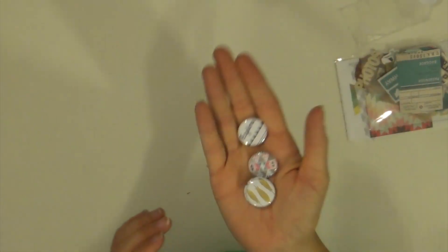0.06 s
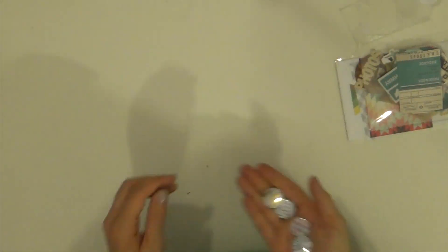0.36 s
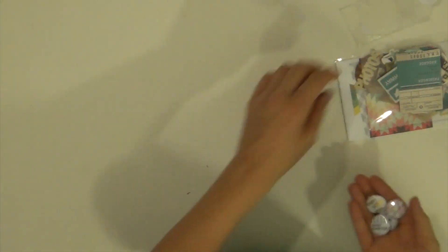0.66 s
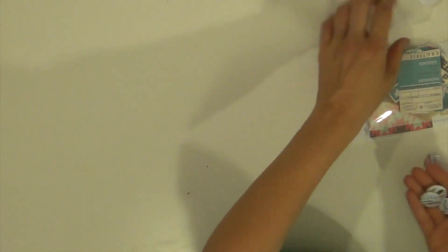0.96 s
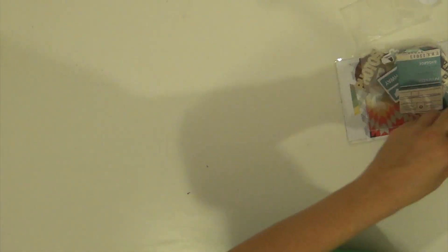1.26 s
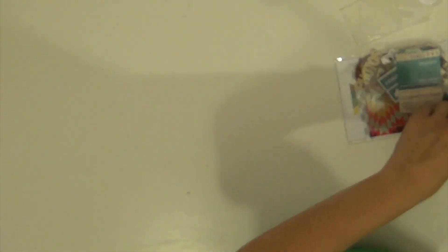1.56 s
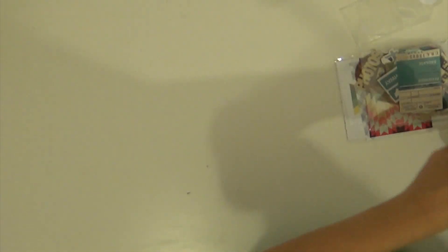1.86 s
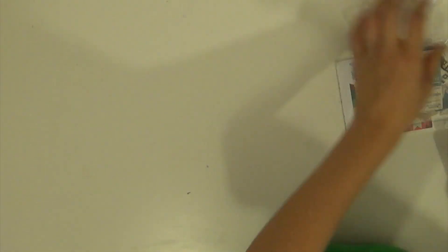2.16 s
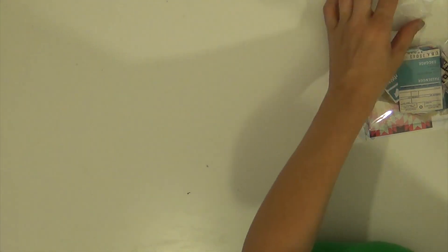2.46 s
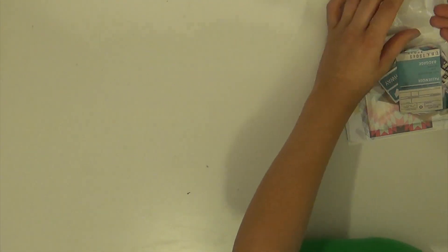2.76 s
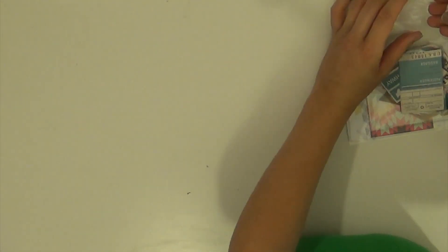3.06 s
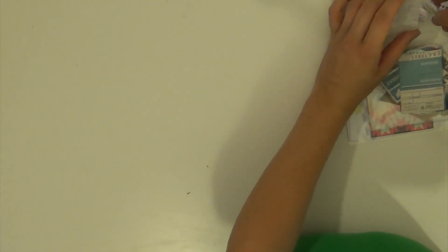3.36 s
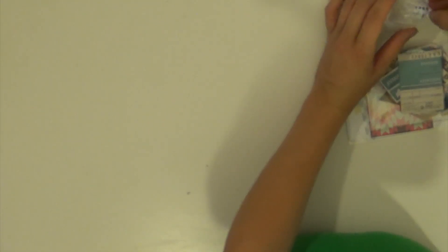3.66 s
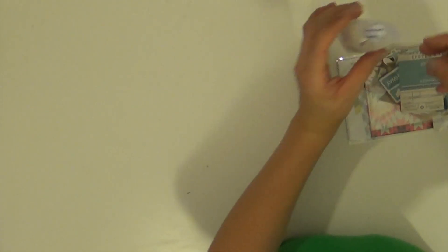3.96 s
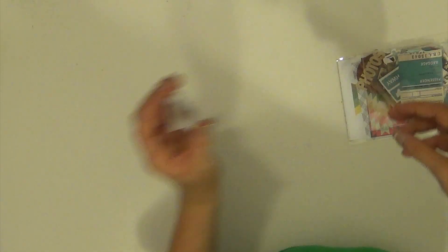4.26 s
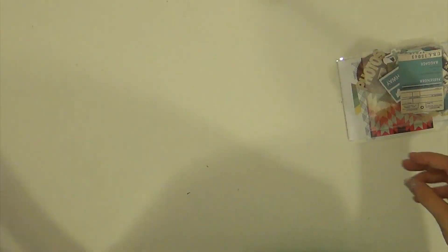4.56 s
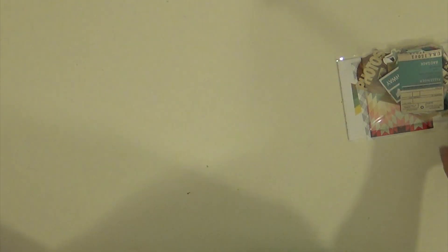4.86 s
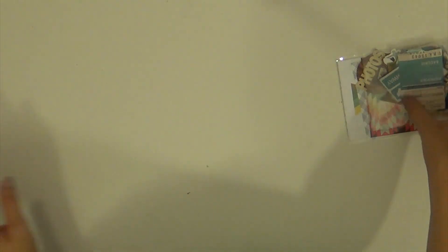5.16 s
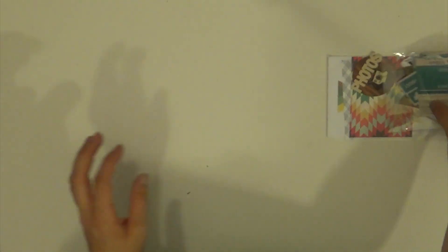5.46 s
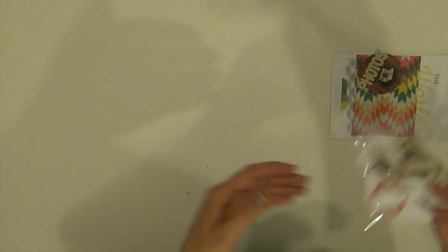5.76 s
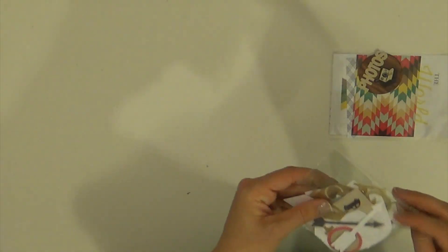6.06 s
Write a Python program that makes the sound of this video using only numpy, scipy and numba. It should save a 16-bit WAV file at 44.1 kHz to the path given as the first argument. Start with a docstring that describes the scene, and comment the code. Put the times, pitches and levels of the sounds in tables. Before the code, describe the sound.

Small metal buttons clink brightly together in a palm. One drops onto a table, bounces several times and briefly rolls to rest. A loud cluster of clinks follows, then a hand bumps the table softly and plastic sleeves crackle. The buttons clink, scrape and tumble as they are gathered up, leaving only light plastic rustling. An overhead microphone picks this up in a small room with a faint electrical hum.

```python
"""A table in a small room with mains hum. Small domed metal buttons clink in a palm, bounce and
roll on the table, then scrape and tumble over each other as they are gathered up; each contact
rings their shell modes. Plastic sleeves slide with tiny slips and crackle as creases give way.
A hand bumps the table. The limiter of a camera overhead flattens the loudest clinks."""
import sys
import numpy as np
from scipy import signal
from scipy.fft import rfft, irfft
from scipy.io import wavfile
from scipy.ndimage import uniform_filter1d, minimum_filter1d
from numba import njit

SR = 44100
rng = np.random.default_rng(int(sys.argv[2]) if len(sys.argv) > 2 else 0)


def digitize_waveform(pressure):
    """Quantize a signal to 16-bit integers and store it at the path in sys.argv[1].

    Rows of a 2-D input are taken as channels; values are limited to [-1, 1].
    """
    field = np.atleast_2d(pressure).T
    bounded = np.clip(field, -1, 1)
    quanta = np.round(bounded * 32767).astype(np.int16)
    wavfile.write(sys.argv[1], SR, quanta)


N = 269142
TIME_S = np.arange(N) / SR
AGE_S = np.arange(SR // 3) / SR  # time since a blow

# mains hum and thin electronic whine: f/Hz, level/dB
HUM_TONES = [(56, -58), (86, -59.5), (120, -54.5), (15735, -68)]
# button on button: t/s, level/dB, ring f/Hz, relative second mode/dB, relative top modes/dB
BUTTON_HITS = [(0.1948, -17, 4550, -19, -8), (0.273, -27, 4770, -20, -7), (0.3127, -13, 4670, -17.5, -6.5),
               (0.3187, -12, 4740, -34, -28), (0.3636, -7, 4640, -8, 4), (0.656, -14, 4670, -39, -8),
               (0.709, -7, 4610, -6, -17), (0.7667, -2.5, 4656, -47, -14), (2.0486, -10.5, 4620, -1, 0),
               (2.0681, 1, 4600, -15, -4), (2.0792, -6.5, 4578, -31, -34), (2.117, -14, 4608, -17, -21),
               (3.317, -14.5, 4597, -14, -4), (3.4041, -16, 4705, -39, -36), (3.4549, -5, 4710, -13, -12),
               (3.479, -14, 4720, -41, -37), (3.5267, -15, 4500, -26, -30), (3.5494, -13.5, 4720, -40, -32),
               (3.585, -4, 4730, -16, -35), (3.6225, -14, 4690, -15.5, -11),
               (3.6952, -14.5, 4730, -42, -30), (3.7917, -13, 4757, -15, -0.5), (3.824, -28, 4700, -13, -6),
               (4.083, -18.5, 4780, -18, 8.5), (4.126, -8, 4690, -14, 0), (4.1402, -10, 4600, -8.5, 5)]
# top shell modes: f/Hz, level/dB
SHELL_TOP_MODES = [(11700, -11.5), (12500, -9.5)]
# button on table: t/s, blow/dB, shell ring/dB, rim crack/dB
BOUNCES = [(0.9211, -17, -3, -8.5), (0.9258, -31, -5.5, -31), (0.943, -21, -10.5, -41),
           (1.0749, -18, -2, -15), (1.0951, -23, -3, -13.5), (1.174, -24, -3.5, -14.5),
           (1.1942, -27.5, -5.5, -12.5), (1.2176, -27.5, -11, -21), (1.2488, -24.5, -7.5, -12),
           (1.2593, -33, -18, -22), (1.3799, -36.5, -30.5, -45), (1.4278, -38.5, -33, -47),
           (1.456, -28, -29.5, -32)]
# hand over plastic: t/s, length/s, slide level/dB, crackle level/dB, crackle brightness/dB
HAND_STROKES = [(1.662, 0.1, -68, -57.5, -3), (2.421, 0.35, -53, -47.5, -2.5), (2.875, 0.15, -51, -41, 0.5),
                (3.428, 0.27, -41.5, -33, -0.5), (4.285, 0.26, -60, -48.5, -2),
                (4.859, 0.07256, -38.5, -34.5, 0), (5.279, 0.65, -50, -50.5, -4),
                (5.934, 0.15, -43, -45.5, 8.5)]
# wire pins on button backs: t/s, level/dB
PIN_TAPS = [(2.048, -11), (3.321, -11)]
# hand on table: t/s, level/dB
HAND_BUMPS = [(2.383, -34.5), (2.467, -31), (5.223, -28)]
# low table modes: f/Hz, level/dB, t60/s
TABLE_MODES = [(251.6, 12, 0.056), (597, 4.5, 0.077)]
# loudest creases: t/s, level/dB, brightness/dB, knock f/Hz
CREASE_SNAPS = [(2.553, -38.5, -0.5, 3760), (2.8709, -35.5, -4.5, 3400), (2.9687, -37, -0.5, 3800),
                (3.2398, -37, 1, 3220), (3.2794, -34, -0.5, 2640), (3.4417, -31, -2, 3950),
                (3.4988, -28, 0, 2290), (3.9498, -27, 6.5, 3500), (4.1847, -23, 5, 4074),
                (4.35, -32.5, 1.5, 1920), (4.5919, -33.5, -0.5, 1830), (4.8557, -31, 2.5, 2980),
                (4.9082, -32.5, -4, 2977), (5.3072, -28, 2.5, 2160), (5.3418, -33.5, 9, 1945),
                (5.484, -36, 5, 3040), (5.588, -38.5, 0.5, 1944), (5.6419, -35, 3, 2660),
                (5.665, -32.5, 3, 1630), (5.9845, -37, -3.5, 1990), (6.016, -31.5, 6.5, 2870)]
# rim on rim: t/s, length/s, level/dB, start f/Hz, end f/Hz
RIM_SCRAPES = [(3.357, 0.015, -32.5, 1870, 2660), (3.408, 0.036, -42.5, 2060, 1080),
               (3.654, 0.014, -35.5, 2270, 2150), (3.72, 0.015, -40, 2140, 2750)]
# envelope of the tumbling pile: t/s, level/dB
TUMBLE_ENVELOPE = [(4.085, -42.5), (4.12, -30.5), (4.14, -27), (4.185, -33.5), (4.24, -90)]
# stiff sleeve modes: f/Hz, level/dB
PACKET_MODES = [(2140, -55), (2970, -56), (4180, -58)]
# room decay: f/Hz, t60/s
ROOM_DECAY = [(250, 0.39), (4700, 0.36), (13000, 0.24)]
# spectra: f/Hz, level/dB
ROOM_AIR = [(25, -38), (118, -6.5), (208, -11.5), (349, -9), (952, -23), (3230, -25), (15200, -34)]
SHELL_CONTACT = [(1000, -36.5), (3500, -8.5), (4700, 6.5), (5400, -7.5), (6800, -21), (12400, -9.5),
                 (15500, -33)]
TABLE_HARD_BLOW = [(60, -40), (250, -14.5), (680, -6), (1680, -3.5), (4000, -6), (5600, -42)]
TABLE_SOFT_BLOW = [(140, -21.5), (235, -2), (650, -4), (5000, -29.5)]
RIM_CRACK = [(400, -34), (2500, -17), (4000, 6), (5600, 4.5), (8400, 6.5), (11500, 6), (13000, -25)]
FILM_SLIDE = [(240, -36), (400, -2.5), (2000, 0.5), (6950, -4), (9760, 0.5), (16000, -17)]
CREASE_BODY = [(400, -9), (1300, 1), (3200, 10), (5000, -11)]
CREASE_MID = [(1500, -15), (3400, -1.5), (6000, 3), (10000, -17)]
CREASE_TREBLE = [(4000, -8), (7500, 12.5), (10700, 20), (13000, 6.5), (16000, -14)]
# side response of the microphone pair: f/Hz, gain/dB
SIDE_RESPONSE = [(60, -21), (250, -7.5), (1000, 2.5), (4700, -3), (9000, -12.5)]

SECOND_MODE_HZ, BOUNCE_RING_HZ, BOUNCE_TOP_HZ = 8980, 4605, 11705


def amp(db):
    """Decibels to gain."""
    return 10 ** (np.asarray(db) / 20)


def colour(x, spectrum):
    """Minimum-phase filter; attacks stay sharp."""
    hz, db = np.transpose(spectrum)
    grid_hz = np.maximum(np.fft.rfftfreq(4096, 1 / SR), 1)
    cepstrum = irfft(np.log(amp(np.interp(np.log(grid_hz), np.log(hz), db))))
    cepstrum[1:len(cepstrum) // 2] *= 2
    cepstrum[len(cepstrum) // 2 + 1:] = 0
    return signal.fftconvolve(x, irfft(np.exp(rfft(cepstrum))))[:len(x)]


def noise(spectrum):
    """Coloured noise, rms 1."""
    x = colour(rng.standard_normal(N), spectrum)
    return x / x.std()


def damping(t60_s, free_s=0):
    """Exponential decay after free_s."""
    return np.exp(-np.log(1000) * np.maximum(AGE_S - free_s, 0) / t60_s)


def fade(t60_s, rise_s=0.00022):
    """Build-up during contact, then decay."""
    return (1 - np.exp(-(AGE_S / rise_s) ** 2)) * damping(t60_s)


def ring(hz, t60_s):
    """One decaying mode."""
    return np.sin(2 * np.pi * hz * AGE_S) * fade(t60_s)


def resonance(hz, t60_s):
    """Decaying mode, unit energy."""
    x = ring(hz, t60_s)
    return x / np.sqrt(np.sum(x ** 2))


def burst(spectrum, t60_s, rise_s=0.00036):
    """Dense cluster of fast modes; energy of 10 ms at rms 1."""
    x = colour(rng.standard_normal(len(AGE_S)) * fade(t60_s, rise_s), spectrum)
    return x / np.sqrt(np.sum(x ** 2) / (0.01 * SR))


def walk(rate_hz):
    """Smooth random wander, spread near 1."""
    step = int(SR / rate_hz)
    return uniform_filter1d(np.repeat(rng.standard_normal(N // step + 1), step), step)[:N]


def slips(per_s, spread_db):
    """Random tiny impacts of uneven size, rms 1."""
    sizes = amp(spread_db * np.minimum(rng.exponential(size=N), np.pi))
    x = (rng.random(N) < per_s / SR) * sizes * rng.choice([-1, 1], N)
    return x / x.std()


def grains(spectrum, per_s, spread_db):
    """Slips heard through a body, rms 1."""
    x = colour(slips(per_s, spread_db), spectrum)
    return x / x.std()


def swell(start_s, length_s, attack_s, release_s):
    """Linear attack; exponential release after length_s."""
    t = TIME_S - start_s
    return np.clip(t / attack_s, 0, 1) * np.exp(-np.maximum(t - length_s, 0) / release_s)


def until_next(hits):
    """One gate per hit: the next contact stops the ring."""
    gaps_s = np.diff(np.array(hits)[:, 0], append=np.inf)
    return [1 / (1 + np.exp(np.minimum((AGE_S - gap_s) * 1000, 20))) for gap_s in gaps_s]


def add(out, t, sound):
    """Mix a sound in at t seconds."""
    start = max(int(t * SR), 0)
    out[start:start + len(sound)] += sound[:N - start]


def hum_and_air(air_db=-53, side_db=-9, waver=0.32):
    """Wavering hum and room air; returns mid, side."""
    hum = np.zeros(N)
    for hz, db in HUM_TONES:
        level = amp(db) * np.sqrt(2) * (1 + waver * walk(rate_hz=11))
        hum += level * np.sin(2 * np.pi * hz * TIME_S + waver * walk(rate_hz=13))
    return hum + amp(air_db) * noise(ROOM_AIR), amp(air_db + side_db) * noise(ROOM_AIR)


def chatter(gap_s=0.0055, count=3):
    """One contact and its quick, duller rebounds."""
    clicks = np.zeros(len(AGE_S))
    rebounds_s = np.cumsum(gap_s * rng.uniform(0.76, 1.2, count))
    clicks[(rebounds_s * SR).astype(int)] = amp(2 * rng.standard_normal(count))
    clicks = uniform_filter1d(clicks, size=4)
    clicks[0] += 1
    return clicks


def rim_mode(hz, t60_s, split=0.011):
    """Upper mode of a crimped shell: a close pair, plus a broad flash at contact."""
    partner = ring(hz * (1 - split * rng.uniform(0.19, 3.2)), t60_s / 2)
    return ring(hz, t60_s) + 0.5 * partner + ring(hz, t60_s / 10)


def clinks(beat_hz=110, back_hz=4100, upper_t60_s=0.039):
    """Two near-equal shells chatter and beat over a lower back-plate note; skin soon damps them."""
    out = np.zeros(N)
    skin = damping(t60_s=0.082, free_s=0.0099)
    for (t, db, hz, second_db, top_db), gate in zip(BUTTON_HITS, until_next(BUTTON_HITS)):
        lift = min(1, 2 * amp(db / 2))  # hard hits lift the shells off the skin
        shell = skin * ring(hz, t60_s=lift * 0.078)
        partner = amp(-14) * ring(hz + beat_hz * rng.uniform(0.46, 1.417), t60_s=lift * 0.21)
        back = amp(-20) * ring(back_hz * rng.uniform(0.83, 1.05), t60_s=0.03)
        contact = amp(9) * colour(chatter(), SHELL_CONTACT)
        top = 0
        for mode_hz, mode_db in SHELL_TOP_MODES:
            detune = 1 + 0.0058 * rng.standard_normal()
            top += amp(top_db + mode_db) * rim_mode(mode_hz * detune, upper_t60_s)
        clack = amp(-18) * burst(SHELL_CONTACT, t60_s=0.05, rise_s=0.0004)
        second = amp(second_db - 1) * rim_mode(SECOND_MODE_HZ, upper_t60_s)
        add(out, t, amp(db) * (gate * (shell + partner + back) + contact + clack + second + top))
    return out


def bounces(ring_t60_s=0.12, flight_s=0.012):
    """A button bounces, ringing freely until its rim touches again; returns shell, table."""
    shell, table = np.zeros(N), np.zeros(N)
    modes = ring(BOUNCE_RING_HZ, ring_t60_s) + amp(-9) * ring(BOUNCE_TOP_HZ, ring_t60_s)
    ringing = modes * damping(t60_s=0.023, free_s=flight_s)
    for (t, blow_db, ring_db, crack_db), gate in zip(BOUNCES, until_next(BOUNCES)):
        add(shell, t, amp(ring_db) * gate * ringing)
        add(table, t, amp(blow_db + 1) * burst(TABLE_HARD_BLOW, t60_s=0.061, rise_s=0.0017))
        add(shell, t, amp(crack_db) * burst(RIM_CRACK, t60_s=0.015))
    return shell, table


def roll():
    """Before the button falls flat, its crimped rim ticks on the table and rings the shell."""
    rim = amp(-45) * resonance(hz=2100, t60_s=0.0022)
    shell = amp(-44) * resonance(BOUNCE_RING_HZ, t60_s=0.018)
    envelope = swell(start_s=1.33, length_s=0.128, attack_s=0.017, release_s=0.011)
    return envelope * signal.fftconvolve(slips(per_s=280, spread_db=1), rim + shell)[:N]


def rustle(slip_db=-2, hiss_db=-4, rest_db=-70):
    """Sliding film: tiny slips over rubbing hiss; barely stirs between strokes."""
    effort = amp(rest_db) * (TIME_S > HAND_STROKES[0][0])
    for t, length_s, db, _, _ in HAND_STROKES:
        effort += amp(db) * swell(t, length_s, attack_s=0.0087, release_s=0.015)
    slipping = amp(slip_db) * grains(FILM_SLIDE, per_s=670, spread_db=8.5)
    return effort * (slipping + amp(hiss_db) * noise(FILM_SLIDE))


def crease(bright_db, knock_hz, size_spread=0.12):
    """Dry click, treble dying first; the size of the spot shifts its middle band."""
    shift = np.exp(size_spread * rng.standard_normal())
    body = amp(-4) * burst(CREASE_BODY, t60_s=0.037) + amp(9) * ring(knock_hz, t60_s=0.007)
    middle = amp(-5) * burst(np.multiply(CREASE_MID, [shift, 1]), t60_s=0.019)
    treble = amp(-3) * burst(CREASE_TREBLE, t60_s=0.0097)
    return amp(-bright_db) * body + middle + amp(bright_db) * treble


def crackle(per_s=14, spread_db=3):
    """Small creases give way at uneven moments in each stroke."""
    out = np.zeros(N)
    for t, length_s, _, db, bright_db in HAND_STROKES:
        for slot_s in np.arange(0, length_s, 1 / per_s):
            delay_s = min(slot_s + rng.random() / per_s, length_s)
            gain = amp(db + spread_db * rng.standard_normal())
            add(out, t + delay_s, gain * crease(bright_db, knock_hz=rng.uniform(1520, 4130)))
    return out


def pins():
    """A wire pin taps its shell: a click and a short, bright ring."""
    out = np.zeros(N)
    for t, db in PIN_TAPS:
        ping = amp(-3) * rim_mode(hz=6100, t60_s=0.01)
        click = amp(-13) * burst(CREASE_MID, t60_s=0.043)
        add(out, t, amp(db) * (ping + click))
    return out


def bumps():
    """A soft hand excites mostly the low table modes."""
    out = np.zeros(N)
    thud = sum(amp(db) * ring(hz, t60_s) for hz, db, t60_s in TABLE_MODES)
    thud /= abs(thud).max()
    for t, db in HAND_BUMPS:
        board = amp(-7) * burst(TABLE_SOFT_BLOW, t60_s=0.07, rise_s=0.0019)
        add(out, t, amp(db) * (thud + board))
    return out


def snaps(settle_s=0.008, settle_db=-12):
    """A crease snaps, then settles with a weaker tick."""
    out = np.zeros(N)
    for t, db, bright_db, hz in CREASE_SNAPS:
        add(out, t, amp(db) * crease(bright_db, hz))
        add(out, t + settle_s * (0.5 + rng.random()), amp(db + settle_db) * crease(bright_db, hz))
    return out


def scrapes(squeak_t60_s=0.009, grit_db=-9):
    """Rim on rim: stick-slip rings a resonance that glides with the contact point."""
    out = np.zeros(N)
    for t, length_s, db, from_hz, to_hz in RIM_SCRAPES:
        progress = np.minimum(AGE_S / length_s, 1)
        drive = slips(per_s=1800, spread_db=7)[:len(AGE_S)] * np.sin(np.pi * progress)
        phasor = np.exp(2j * np.pi * np.cumsum(from_hz + (to_hz - from_hz) * progress) / SR)
        baseband = signal.fftconvolve(drive / phasor, fade(squeak_t60_s))[:len(AGE_S)]
        squeak = np.imag(phasor * baseband)
        grit = colour(drive, CREASE_BODY)
        for part, part_db in ((squeak, db), (grit, db + grit_db)):
            rms = np.sqrt((np.sum(part ** 2) + 1e-12) / (length_s * SR))
            add(out, t, amp(part_db) * part / rms)
    return out


def tumble(table_db=-4):
    """Many rims scrape together, rattle on the table and come to rest."""
    times_s, db = np.transpose(TUMBLE_ENVELOPE)
    moving = (TIME_S >= times_s[0]) & (TIME_S < times_s[-1])
    envelope = moving * amp(np.interp(TIME_S, times_s, db))
    rims = sum(grains(spectrum, per_s=1500, spread_db=2) for spectrum in (RIM_CRACK, SHELL_CONTACT))
    return envelope * (rims + amp(table_db) * noise(TABLE_HARD_BLOW))


def packet(t60_s=0.035):
    """A packet is drawn off the pile; fine slips keep its stiff sleeve faintly singing."""
    sleeve = sum(amp(db) * resonance(hz, t60_s) for hz, db in PACKET_MODES)
    envelope = swell(start_s=5.8, length_s=0.62, attack_s=0.67, release_s=0.05)
    return envelope * signal.fftconvolve(slips(per_s=2500, spread_db=2), sleeve)[:N]


def room(x, gap_s=0.00333):
    """Diffuse tail after the nearest reflection; one decay per band."""
    centres_hz, t60s_s = np.transpose(ROOM_DECAY)
    log_hz = np.log(np.fft.rfftfreq(len(AGE_S), 1 / SR) + 1)
    scatter = rfft(rng.standard_normal(len(AGE_S)))
    tail = np.zeros(len(AGE_S))
    for band, t60_s in zip(np.eye(len(ROOM_DECAY)), t60s_s):
        weight = np.interp(log_hz, np.log(centres_hz), band)
        tail += irfft(scatter * weight, len(AGE_S)) * fade(t60_s)
    tail *= AGE_S > gap_s
    return signal.fftconvolve(x, tail / np.sqrt(np.sum(tail ** 2)))[:N]


def scene(shell_wet_db=-13, table_wet_db=-5, handling_wet_db=-8, side_wet_db=-6):
    """Stereo mix, sources slightly left; the table feeds the room most."""
    bounce_ring, bounce_clatter = bounces()
    shells = clinks() + pins() + scrapes() + bounce_ring
    table = bounce_clatter + roll() + bumps()
    handling = snaps() + rustle() + packet() + tumble() + crackle()
    send = amp(shell_wet_db) * shells + amp(table_wet_db) * table + amp(handling_wet_db) * handling
    air_mid, air_side = hum_and_air()
    mid = shells + table + handling + room(send) + air_mid
    leftward = 0.28 * shells + 0.19 * (table + handling)
    side = colour(leftward + amp(side_wet_db) * room(send) + air_side, SIDE_RESPONSE)
    return np.array([mid + side, mid - side])


@njit
def peak_follower(x, release):
    """Instant rise, exponential fall."""
    out, held = np.empty(len(x)), 0.
    for i in range(len(x)):
        held = max(x[i], held * release)
        out[i] = held
    return out


def record(dry, ceiling_db=-6, release_s=0.011, cutoff_hz=16600):
    """Fast peak limiter, then a steep low-pass."""
    peaks = peak_follower(abs(dry).max(axis=0), np.exp(-1 / (release_s * SR)))
    gain = np.minimum(1, amp(ceiling_db) / (peaks + 1e-9))
    smooth_gain = uniform_filter1d(minimum_filter1d(gain, size=64), size=64)
    lowpass = signal.ellip(8, 0.2, 70, cutoff_hz, fs=SR, output="sos")
    return signal.sosfilt(lowpass, dry * smooth_gain)


dry = scene()
out = record(dry)
digitize_waveform(out)
```